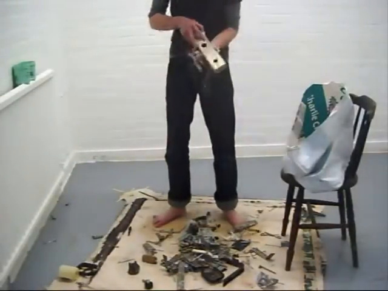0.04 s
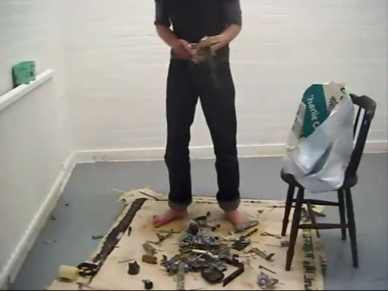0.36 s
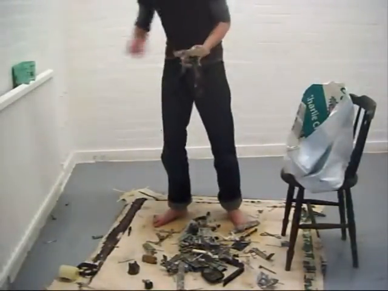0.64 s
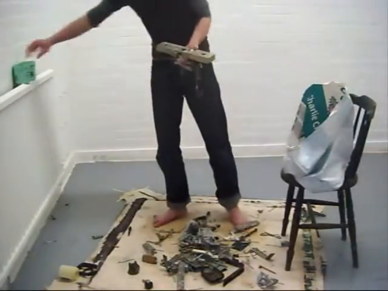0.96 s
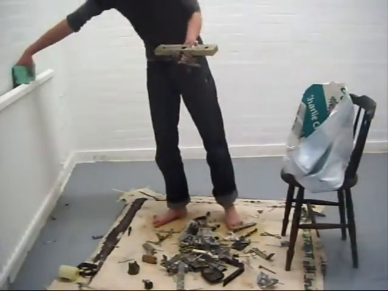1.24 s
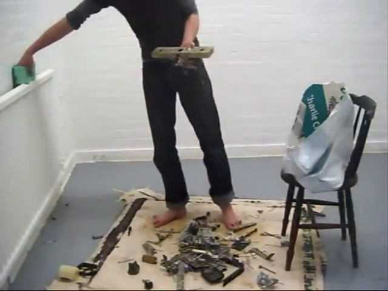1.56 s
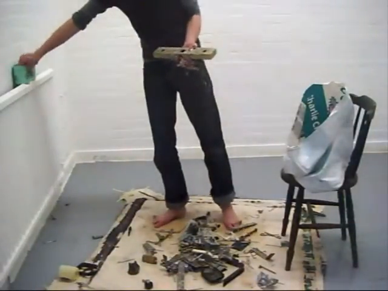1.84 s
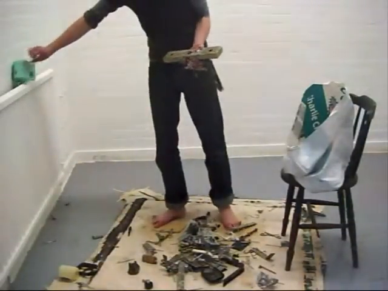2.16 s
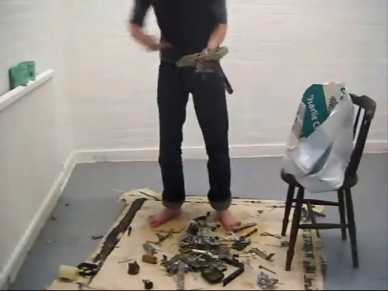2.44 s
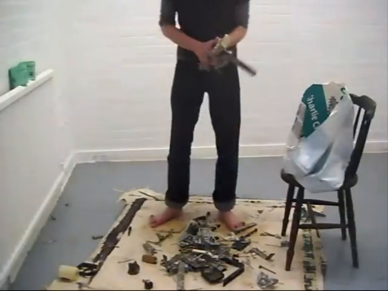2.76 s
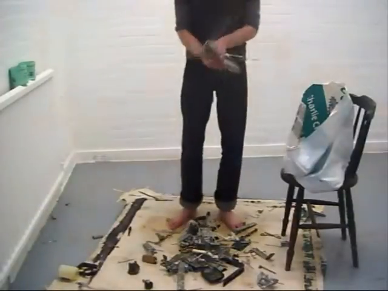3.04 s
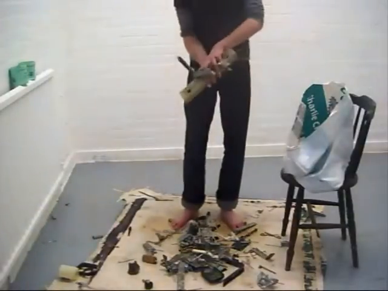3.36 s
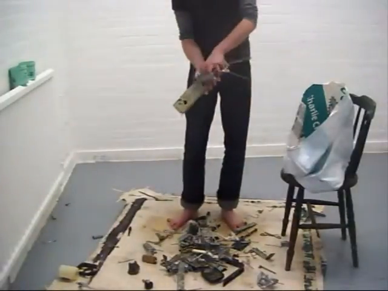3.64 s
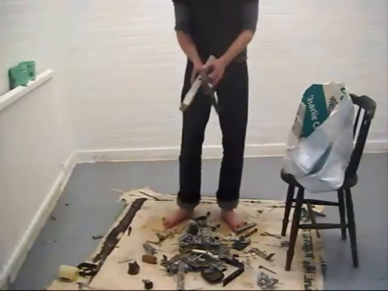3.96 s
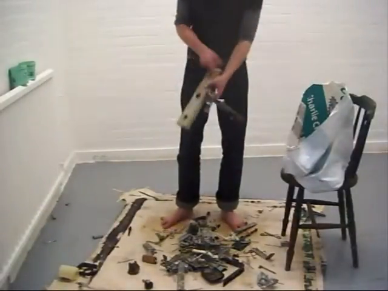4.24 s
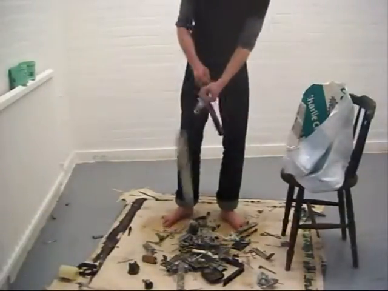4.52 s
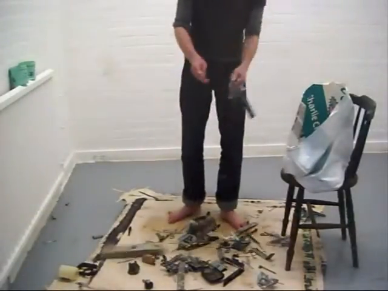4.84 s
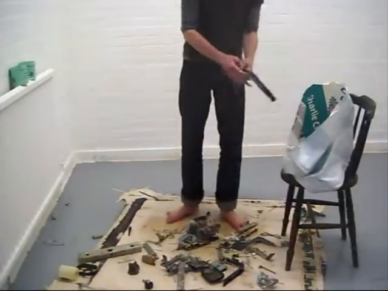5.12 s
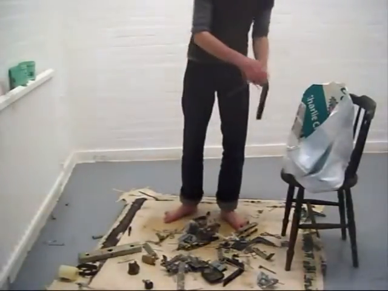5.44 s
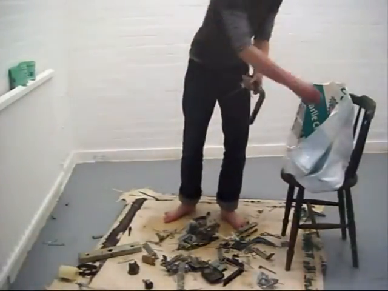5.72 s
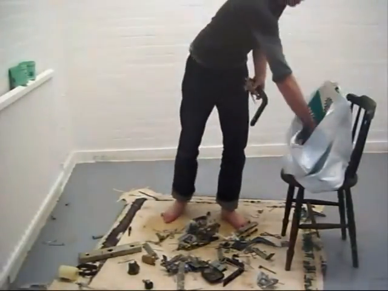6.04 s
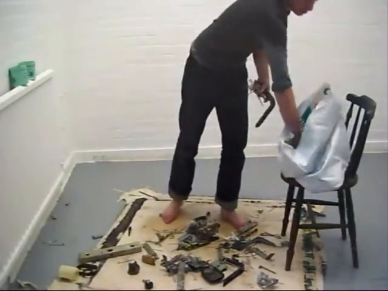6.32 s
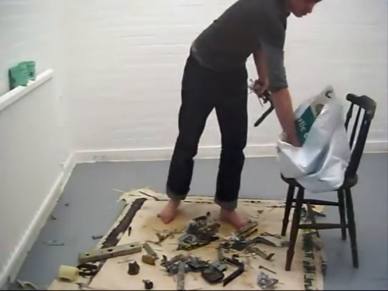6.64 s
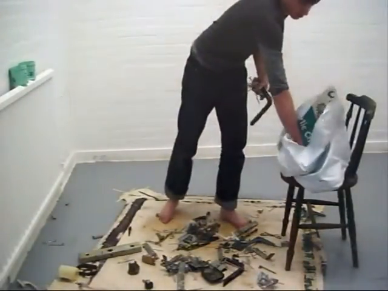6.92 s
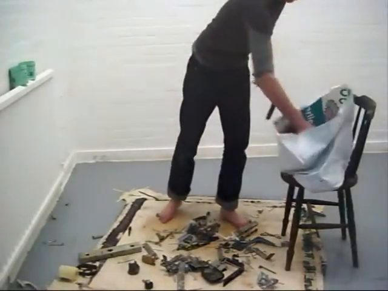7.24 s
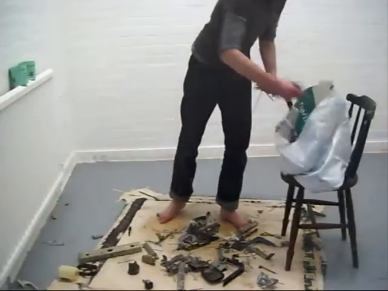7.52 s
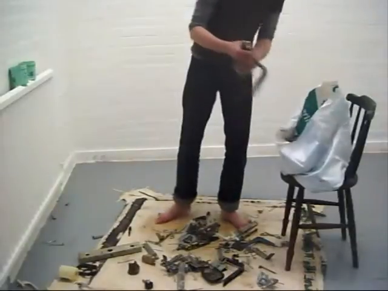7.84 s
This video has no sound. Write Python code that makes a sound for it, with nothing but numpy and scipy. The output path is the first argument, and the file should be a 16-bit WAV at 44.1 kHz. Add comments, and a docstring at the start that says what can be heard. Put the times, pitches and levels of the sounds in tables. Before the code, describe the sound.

Scrap steel is handled in a bare, echoing room. It opens with a few light clinks and soft scrapes. From about 1.1 to 2.5 seconds come dull, hollow, wooden knocks among small metal ticks, the strongest near 2.4. Between 2.7 and 4.5 seconds, steel rubs on steel in short, quiet scrapes with scattered clinks. At 4.7 a steel plate crashes onto a scrap pile, by far the loudest sound, clanging, thumping the floor and setting loose pieces chattering, with smaller bounces until about 5.3. A sharp, bright clink follows at 5.8. From 6.1 to 7.6 a hand rummages in a crinkling plastic sack while metal shifts inside; pieces jangle and ring high as they are lifted out around 7.2 to 7.6. A knock and clink land at 7.7, then a lower ringing clink near 7.9. Faint room air, low hum and a thin high whine continue throughout.

```python
"""A bare, echoing room where scrap steel is handled. Pieces clink, ring and scrape in the hands, among
dull, hollow knocks. A steel plate crashes onto the pile on the floor and bounces, thumping the floor
and setting the scrap chattering. A small piece lands on the hard floor, then a hand rummages in a
crinkling plastic sack of scrap, and pieces jangle as they are lifted out.
Under it lie room air and a low hum; the camera whines faintly and overloads on the crash."""
import sys
import numpy as np
from scipy import signal
from scipy.fft import rfft, irfft
from scipy.io import wavfile
from scipy.ndimage import map_coordinates

SR = 44100
rng = np.random.default_rng(int(sys.argv[2]) if len(sys.argv) > 2 else 0)


def waveform_to_disk(signal):
    """Save audio, clipped to [-1, 1], as 16-bit WAV at the path in sys.argv[1]."""
    frames = np.transpose(np.atleast_2d(signal))
    scaled = np.clip(frames, -1, 1) * 32767
    samples = np.round(scaled).astype(np.int16)
    wavfile.write(sys.argv[1], SR, samples)


N = 356328
TIME_S = np.arange(N) / SR
AGE_S = np.arange(SR) / SR  # time since a blow


def amp(db):
    """Decibels to gain."""
    return 10 ** (np.asarray(db) / 20)


def unit_rms(x):
    """Scale to rms 1."""
    return x / np.sqrt(np.mean(x ** 2) + 1e-20)


def unit_attack(x):
    """Scale a blow to rms 1 over its first 25 ms."""
    return x / np.sqrt(np.mean(x[:SR // 40] ** 2) + 1e-20)


def unit_energy(x):
    """Scale to energy 1."""
    return x / np.linalg.norm(x)


def along(points, hz):
    """Interpolate (Hz, value) points on a log frequency axis."""
    points_hz, values = np.transpose(points)
    return np.interp(np.log(hz + 1), np.log(points_hz + 1), values)


def add(track, start_s, sound):
    """Mix a sound into the track."""
    start = max(round(start_s * SR), 0)
    track[start:start + len(sound)] += sound[:N - start]


def colour(x, spectrum, size=4096):
    """Minimum-phase filter through (Hz, dB) points."""
    gain = amp(along(spectrum, np.fft.rfftfreq(size, 1 / SR)))
    cepstrum = irfft(np.log(gain))
    cepstrum[1:size // 2] *= 2
    cepstrum[size // 2 + 1:] = 0
    impulse = irfft(np.exp(rfft(cepstrum)))
    return signal.fftconvolve(x, impulse)[:len(x)]


def butter(x, order, hz, kind):
    """Butterworth filter."""
    return signal.sosfilt(signal.butter(order, hz, kind, fs=SR, output="sos"), x)


def fade(t60_s, age_s=AGE_S):
    """Decay of 60 dB in t60_s."""
    return np.exp(-np.log(1000) * age_s / t60_s)


def burst(t60_s):
    """Dying noise of a contact, energy 1."""
    return unit_energy(rng.standard_normal(SR) * fade(t60_s))


def ring(modes, scatter_db):
    """Damped modes (Hz, dB, t60 s) at strengths that depend on the spot struck, energy 1."""
    out = np.zeros(SR)
    for hz, db, t60_s in modes:
        age_s = AGE_S[:int(t60_s * SR)]
        strength = rng.choice([-1, 1]) * amp(db + scatter_db * rng.standard_normal())
        out[:len(age_s)] += strength * np.sin(2 * np.pi * hz * age_s) * fade(t60_s, age_s)
    return unit_energy(out)


def piece(t60_s, mode_count=36):
    """An odd-shaped bit of steel: unrelated modes, the high ones dying sooner; t60_s holds at 5 kHz."""
    modes_hz = rng.uniform(2800, 15500, mode_count)
    return ring([(hz, 0, t60_s * np.sqrt(5000 / hz)) for hz in modes_hz], scatter_db=-1)


def grains(per_s, spread_db):
    """Random tiny contacts of uneven size."""
    hits = rng.random(N) < per_s / SR
    signs = rng.choice([-1, 1], N)
    return hits * signs * amp(spread_db * np.clip(rng.standard_normal(N), -2, 2))


def clumps(per_s, depth_db):
    """A gain that surges and slackens at random."""
    knots = rng.uniform(-1.5, 1, int(N * per_s / SR) + 4)
    return amp(depth_db * map_coordinates(knots, [TIME_S * per_s]))


# Reverberation. Each row: frequency in Hz, t60 in seconds.
ROOM_DECAY = [(100, 0.68), (350, 0.93), (800, 0.76), (2000, 0.9), (5000, 0.62), (9000, 0.49), (15000, 0.29)]

def room(x, direct_db):
    """Direct sound plus the bare walls' dense answer, different for every spot."""
    hz, frame_s, noise = signal.stft(rng.standard_normal(SR * 3 // 2), SR, nperseg=256)
    decay = fade(along(ROOM_DECAY, hz)[:, None], frame_s)
    tail = signal.istft(noise * decay, SR, nperseg=256)[1]
    age_s = np.arange(len(tail)) / SR
    onset = 1 - np.exp(-age_s / 0.00097)
    near_walls = 1 + 0.34 * np.exp(-age_s / 0.018)
    impulse = unit_energy(tail * onset * near_walls)
    impulse[0] = amp(direct_db)
    return signal.fftconvolve(x, impulse)[:max(len(x), len(impulse))]


# Room air. Each row: frequency in Hz, gain in dB.
AIR_SPECTRUM = [(20, 7), (60, 6), (150, 2), (330, 6.5), (800, -1), (1570, -7), (4000, -15), (9000, -17),
                (16000, -19)]
# Hum and whine. Each row: frequency in Hz, rms level in dB.
STEADY_TONES = [(188, -73), (7827, -87), (7887, -74.5), (10002, -68.5)]

def background():
    """Room air, a low hum and the camera's thin whine."""
    air = unit_rms(colour(rng.standard_normal(N), AIR_SPECTRUM))
    tones = sum(amp(db) * np.sqrt(2) * np.sin(2 * np.pi * hz * TIME_S) for hz, db in STEADY_TONES)
    return amp(-59) * air + tones


# Sliding steel. Each row: frequency in Hz, gain in dB.
GRIND_SPECTRUM = [(200, -25.5), (550, 1.5), (1000, 2), (1700, 2.5), (2600, -3.5), (4500, -11.5),
                  (9000, -52.5)]
HISS_SPECTRUM = [(1500, -26.5), (3300, 0.5), (6000, 4.5), (8000, -2), (12000, -7), (16000, -16)]
# Each row: start in seconds, length in seconds, relative grind and hiss levels in dB.
SCRAPE_STROKES = [(0.0, 0.18, -55, -52), (0.25, 0.34, -63, -63.5), (1.928, 0.065, -68, -56),
                  (2.66, 0.27, -66, -66), (2.943, 0.2, -65, -60.5), (3.22, 0.31, -61.5, -69.5),
                  (3.511, 0.11, -63, -61), (3.6, 0.23, -47.5, -58), (4.251, 0.26, -64, -51)]

def scrapes(bite_s=0.0088, hold_share=0.37):
    """Rough steel bites at once, then catches and slips in a dense run of tiny contacts."""
    out = np.zeros(N)
    slips = clumps(per_s=59, depth_db=1.5) * grains(per_s=3500, spread_db=2.5)
    grind = unit_rms(colour(slips, GRIND_SPECTRUM))
    hiss = unit_rms(colour(slips, HISS_SPECTRUM))
    for start_s, length_s, grind_db, hiss_db in SCRAPE_STROKES:
        pressure = np.interp(TIME_S - start_s, [0, bite_s, length_s * hold_share, length_s], [0, 1, 1, 0])
        out += pressure * (amp(grind_db) * grind + amp(hiss_db) * hiss)
    return room(out, direct_db=4.5)


# Resonances of hollow wood. Each row: frequency in Hz, gain in dB.
WOOD_LOW_SPECTRUM = [(60, -40.5), (200, -17), (470, 0), (600, -8), (900, -17.5), (2500, -34), (8000, -36)]
WOOD_HIGH_SPECTRUM = [(150, -34.5), (520, -31.5), (680, 6.5), (760, 9.5), (920, -9), (1200, -34.5),
                      (3000, -29), (8000, -51.5)]
# Each row: start in seconds, relative levels of the low and the high resonance in dB.
HOLLOW_KNOCKS = [(1.141, -51.5, -51), (1.213, -39, -49.5), (1.950, -45.5, -53), (2.193, -40, -44.5),
                 (2.268, -44, -68), (2.398, -35, -27), (2.466, -40.5, -42), (3.912, -61, -46.5),
                 (6.105, -49, -57), (7.724, -38, -47.5)]

def knocks():
    """Dull, hollow knocks, such as a box on a ledge or a bumped chair: two broad, damped resonances."""
    out = np.zeros(N)
    for start_s, low_db, high_db in HOLLOW_KNOCKS:
        for spectrum, db in ((WOOD_LOW_SPECTRUM, low_db), (WOOD_HIGH_SPECTRUM, high_db)):
            push = unit_energy(fade(t60_s=0.00047))
            rattle = burst(t60_s=0.027)
            knock = room(colour(push + rattle, spectrum), direct_db=-6)
            add(out, start_s, amp(db - 2.5) * unit_attack(knock))
    return out


# Plastic and the scrap inside. Each row: frequency in Hz, gain in dB.
SACK_SPECTRUM = [(80, -30), (190, -15), (340, -2), (800, 1), (2200, -7), (3200, -11), (8000, -19.5),
                 (16000, -35)]
JINGLE_SPECTRUM = [(500, -3), (2500, -24), (4000, 2.5), (6300, 6), (8000, -3), (10500, 2), (16000, -21)]
# Effort of the hand. Each row: time in seconds, relative level in dB.
DIG_EFFORT = [(6.103, -40.5), (6.25, -46), (6.6, -48), (6.85, -50), (7.15, -41), (7.46, -40), (7.66, -53.5)]

def rummage(piece_count=14, reach_s=0.31, jingle_db=-3.5, deeper_db_per_s=4):
    """The sack crinkles while the pieces inside shift over one another, louder as the hand digs deeper."""
    dig_s, dig_db = np.transpose(DIG_EFFORT)
    effort = amp(np.interp(TIME_S, dig_s, dig_db, left=-120, right=-120))
    inside_s = np.clip(TIME_S - dig_s[0], 0, dig_s[-1] - dig_s[0])
    touch = np.minimum(inside_s / reach_s, 1) * amp(jingle_db + deeper_db_per_s * inside_s)
    surges = clumps(per_s=60, depth_db=3.5)
    crinkle = unit_rms(colour(surges * grains(per_s=330, spread_db=7), SACK_SPECTRUM))
    scrap = np.zeros(N)
    for _ in range(piece_count):  # each piece keeps its own ring
        voice = piece(t60_s=0.038, mode_count=10) + amp(-4) * burst(t60_s=0.002)
        scrap += signal.fftconvolve(surges * grains(per_s=11, spread_db=4), voice)[:N]
    jingle = unit_rms(colour(scrap, JINGLE_SPECTRUM))
    return room(effort * (crinkle + touch * jingle), direct_db=-3)


# Pieces lifted from the sack. Each row: start in seconds, length in seconds, level in dB.
LIFTS = [(7.206, 0.055, -34), (7.40, 0.09, -31)]

def jangles(taps_per_s=45, low_cut_hz=4550):
    """Hanging pieces swing together, each tap with its own brief ring; being small, they radiate few lows."""
    out = np.zeros(N)
    for start_s, length_s, db in LIFTS:
        taps = np.zeros(N)
        count = max(round(length_s * taps_per_s), 1)
        for k in range(count):
            tap_s = start_s + length_s * (k + rng.uniform(0, 0.42)) / count
            add(taps, tap_s, piece(t60_s=0.19, mode_count=26))
        radiated = butter(taps, 2, low_cut_hz, "high")
        out += amp(db) * np.sqrt(length_s * SR) * unit_energy(room(radiated, direct_db=0.5))
    return out


# Each row: start in seconds, frequency in Hz, attack level in dB, t60 in seconds.
PIECE_PARTIALS = [(1.568, 5110, -46, 0.015), (2.268, 1900, -55, 0.0019), (3.737, 4010, -48.5, 0.033),
                  (4.016, 2480, -40, 0.003), (4.016, 4120, -33, 0.0047), (4.016, 5900, -41, 0.0034),
                  (4.337, 2830, -40, 0.004), (4.810, 4680, -20, 0.054), (4.948, 3937, -26.5, 0.14),
                  (5.25, 5560, -39, 0.06), (5.784, 1150, -33, 0.0085), (7.111, 6804, -46.5, 1.1),
                  (7.256, 7994, -41, 0.81), (7.39, 9850, -35, 0.68), (7.41, 3553, -50, 0.52),
                  (7.56, 5250, -35, 0.16), (7.928, 1412, -45, 0.64), (7.928, 2226, -41, 0.11),
                  (7.928, 5720, -47, 0.17), (7.928, 6120, -46, 0.3)]

def singing():
    """A struck piece rings with a beating pair of partials, choked in a grip, long when hanging free."""
    out = np.zeros(N)
    for start_s, hz, db, t60_s in PIECE_PARTIALS:
        upper_hz = hz * rng.uniform(1.015, 1.08)
        pair = ring([(hz, 0, t60_s), (upper_hz, -3, t60_s / 2)], scatter_db=-1.5)
        radiated = butter(pair, 2, hz / 2, "high")
        add(out, start_s, amp(db) * unit_attack(room(radiated, direct_db=5)))
    return out


# Clank, ring and sparkle bands. Each row: lower and upper edge in Hz.
CLINK_BANDS = [(700, 2000), (3600, 6900), (8200, 15700)]
# Each row: start in seconds, main resonance in Hz, relative level in dB, brightness in dB
# (light, sharp pieces above 0; heavy, blunt ones below).
CLINK_HITS = [(0.003, 3970, -42.5, -2), (0.064, 5400, -42, -4.5), (0.256, 4100, -50.5, -6.5),
              (1.134, 4660, -48.5, 2), (1.235, 3970, -46.5, 3), (1.570, 8100, -54.5, 13),
              (2.397, 3500, -48, -3), (3.094, 5650, -38, 3.5), (3.905, 5540, -43.5, 7),
              (4.016, 6800, -41, -4), (4.338, 4500, -45, 4), (4.408, 7700, -38, 8),
              (5.249, 10600, -25.5, -0.5), (5.776, 5650, -24, 0), (5.783, 9730, -23.5, 9.5),
              (6.355, 6000, -48.5, 10), (6.455, 5570, -40, -1.5), (6.60, 6130, -39.5, 3),
              (6.627, 4340, -36.5, -1.5), (6.695, 5500, -37.5, 3.5), (6.933, 5700, -34.5, -2),
              (6.998, 13600, -45.5, 12), (7.111, 6700, -39, 7), (7.207, 6000, -30.5, 8.5),
              (7.255, 4580, -36, 10), (7.39, 10200, -40, 3), (7.557, 5700, -30.5, 4.5),
              (7.722, 5800, -29.5, 2.5), (7.927, 1860, -37, -3), (8.043, 5600, -42.5, 2)]

def clinks(resonance_q=12):
    """Small pieces strike, each sharp crack followed by a quick echo off the floor."""
    out = np.zeros(N)
    for start_s, resonance_hz, db, bright_db in CLINK_HITS:
        strike = burst(t60_s=0.0094) + amp(-4) * burst(t60_s=0.042)
        floor_echo = amp(-9) * np.roll(burst(t60_s=0.015), int(SR * rng.uniform(0.006, 0.012)))
        crack = strike + floor_echo
        resonance = signal.lfilter(*signal.iirpeak(resonance_hz, resonance_q, fs=SR), crack)
        clink = room(crack + amp(3.5) * resonance, direct_db=-4.5)
        balance_db = (-8.5 - bright_db, -3, -8.5 + bright_db)  # brightness trades clank for sparkle
        for band_hz, band_db in zip(CLINK_BANDS, balance_db):
            add(out, start_s, amp(db + band_db) * unit_attack(butter(clink, 3, band_hz, "band")))
    return out


# Floor thud, plate rattle and scrap chatter. Each row: frequency in Hz, gain in dB.
THUD_SPECTRUM = [(15, -35), (45, -12.5), (80, -18), (150, -6), (300, 0.5), (460, 3.5), (900, 4.5),
                 (2500, -59)]
RATTLE_SPECTRUM = [(250, -37.5), (580, -12.5), (780, 6.5), (1080, 2.5), (1220, -10), (1900, -8),
                   (3000, -35)]
CHATTER_SPECTRUM = [(200, -28.5), (700, 5.5), (1500, -1.5), (2700, -7), (4500, -0.5), (6300, 5), (7500, -3),
                    (10000, -1.5), (13000, -6), (16000, -9.5)]
# Each row: frequency in Hz, relative level in dB, t60 in seconds.
PLATE_MODES = [(490, -3, 0.39), (687, -0.5, 0.3), (766, 4.5, 0.32), (843, -1.5, 0.18), (1019, 3, 0.28),
               (1051, 2, 0.23), (1502, -8, .45), (2716, -7, 0.55), (4700, -14.5, 0.6), (6220, -15, .45),
               (6460, -11, 0.39)]
# Landing, bounces and topple. Each row: start in seconds, relative thud, clang and chatter levels in dB.
PLATE_HITS = [(4.693, -24.5, -18.5, -7), (4.784, -31, -14.5, -12.5), (4.811, -37.5, -15, -20),
              (4.947, -44.5, -24, -19), (5.249, -33.5, -31.5, -35)]

def crash(slap_delay_s=0.007, corner_db=-2.5):
    """Corner, then face: both contacts ring the plate and shake the scrap; the face thumps the floor."""
    out = np.zeros(N)
    for start_s, thud_db, clang_db, chatter_db in PLATE_HITS:
        thud = room(colour(burst(t60_s=0.051), THUD_SPECTRUM), direct_db=-3)
        add(out, start_s + slap_delay_s, amp(thud_db + 3.5) * unit_attack(thud))
        for delay_s, contact_db in ((0, corner_db), (slap_delay_s, 0)):
            ringing = room(ring(PLATE_MODES, scatter_db=0.5), direct_db=7.5)
            rattle = unit_energy(colour(burst(t60_s=0.036), RATTLE_SPECTRUM))  # pressed against the pile
            clang = amp(clang_db) * unit_attack(ringing + amp(14) * room(rattle, direct_db=-6))
            scrap = colour(burst(t60_s=0.056) + amp(-16.5) * piece(t60_s=0.11), CHATTER_SPECTRUM)
            chatter = amp(chatter_db - 1.5) * unit_attack(room(scrap, direct_db=-8))
            add(out, start_s + delay_s, amp(contact_db) * (clang + chatter))
    return out


def scene():
    """All sources at one microphone."""
    steel = clinks() + singing() + crash()
    return (steel + knocks() + scrapes() + rummage() + jangles() + background())[None]


def record(dry):
    """The camera's microphone port dulls one narrow band; peaks are flattened and the top is cut off."""
    port_hz, ceiling, top_hz = 2750, 0.95, 15900
    dulled = dry - 0.07 * signal.lfilter(*signal.iirpeak(port_hz, 3, fs=SR), dry)
    clipped = dulled / (1 + np.abs(dulled / ceiling) ** 6) ** (1 / 6)
    return signal.sosfilt(signal.ellip(10, 0.2, 70, top_hz, fs=SR, output="sos"), clipped)


dry = scene()
out = record(dry)
waveform_to_disk(out)
```